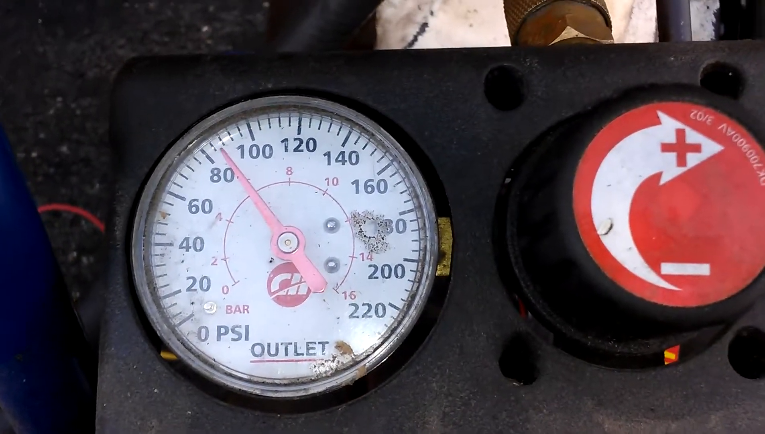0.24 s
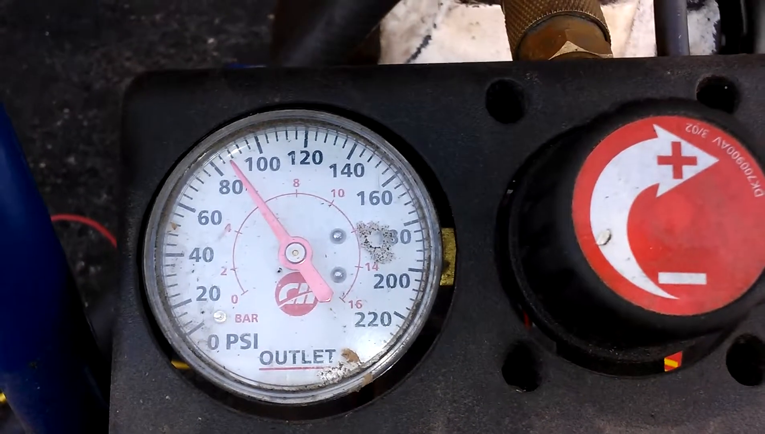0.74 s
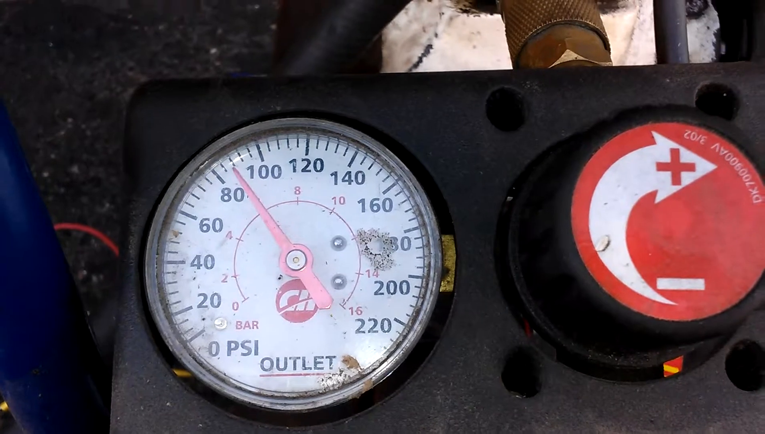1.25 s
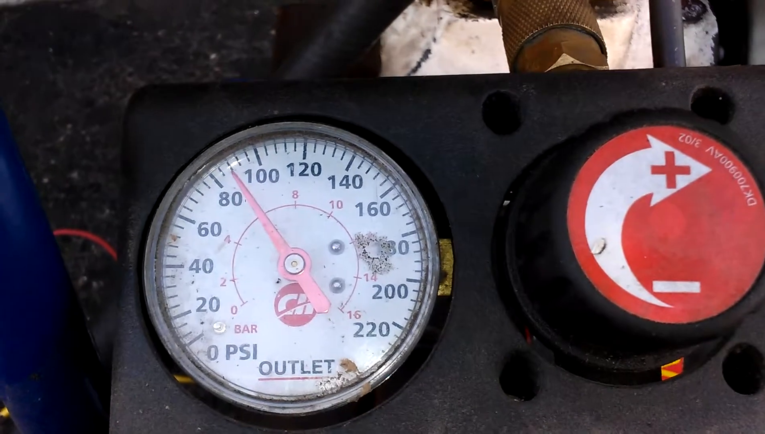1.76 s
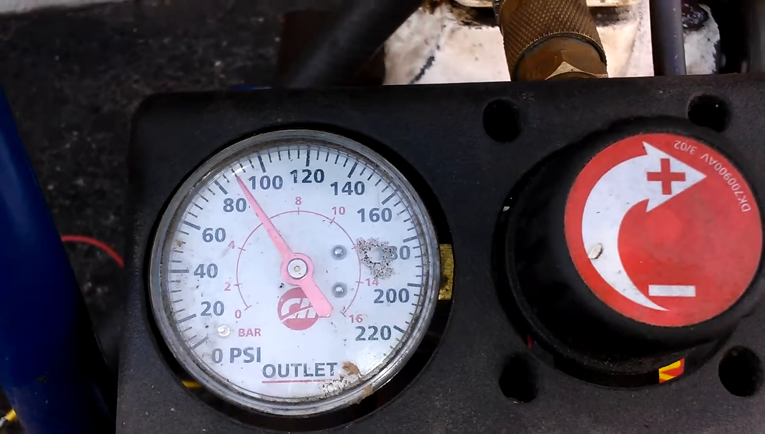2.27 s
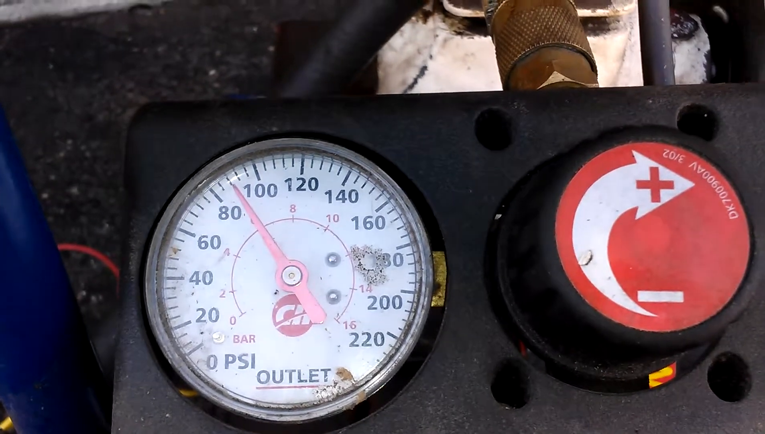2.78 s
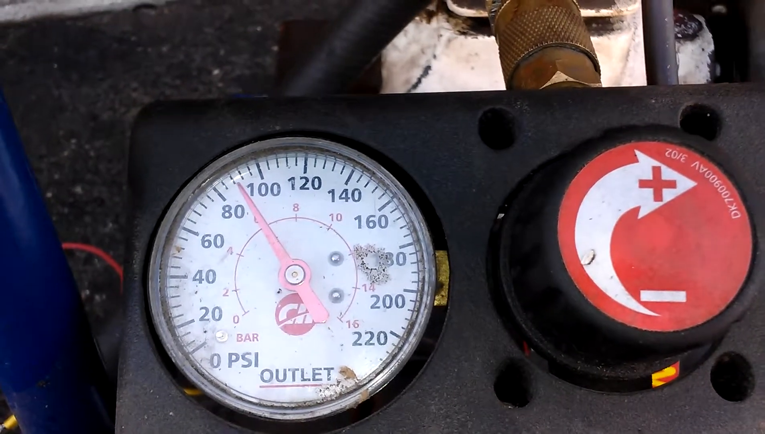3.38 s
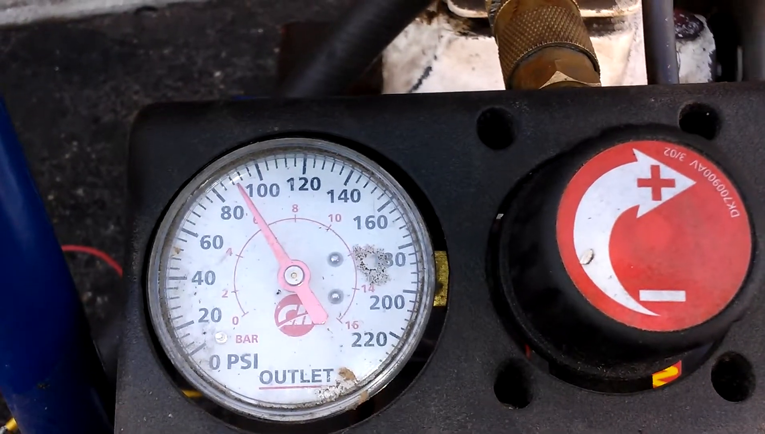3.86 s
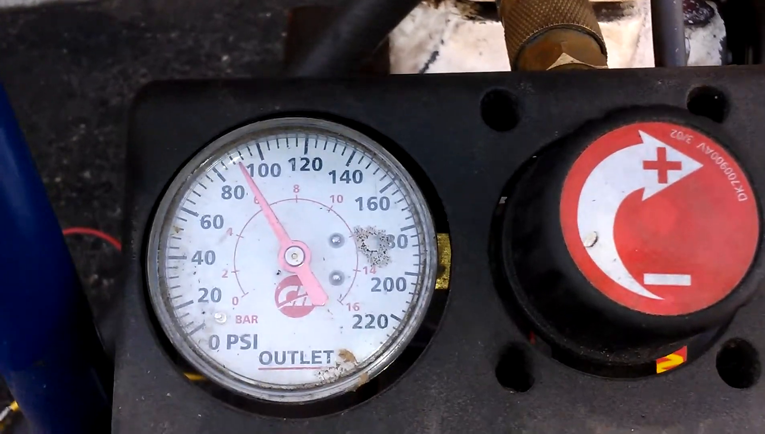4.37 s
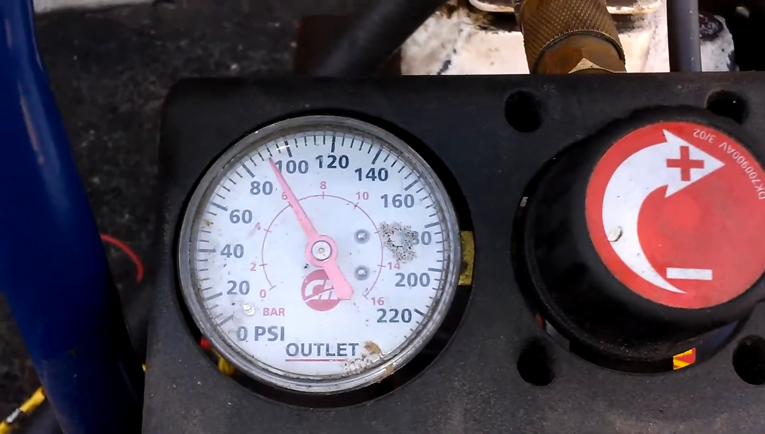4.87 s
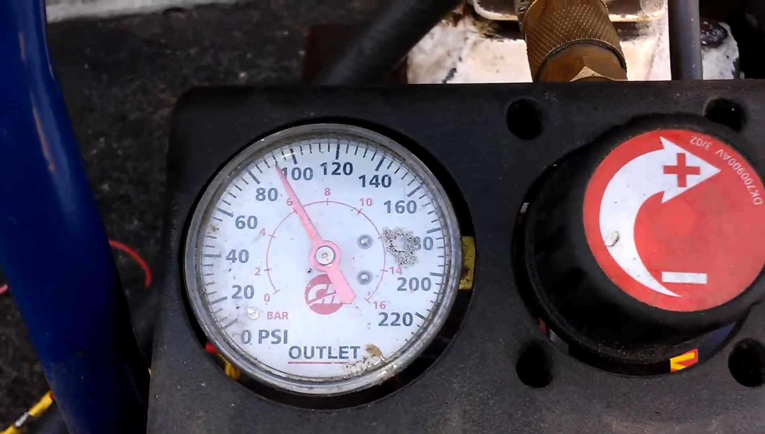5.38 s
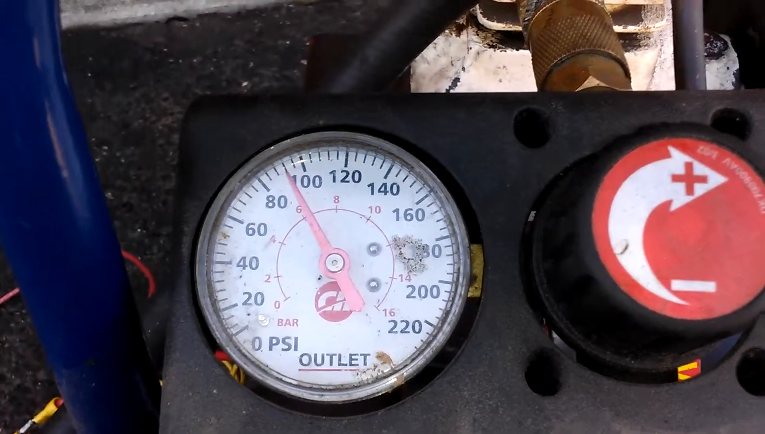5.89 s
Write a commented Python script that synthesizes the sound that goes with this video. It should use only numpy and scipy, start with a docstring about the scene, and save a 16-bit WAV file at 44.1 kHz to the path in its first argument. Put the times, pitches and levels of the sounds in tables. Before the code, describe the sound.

A small piston air compressor hammers along at close range, a fast, loud, rattling chug with metallic knocks, hissing air and buzzing panel.

```python
"""Beside a small motor-driven piston compressor filling a tank, a phone microphone close to the gauge panel.
Each crank turn rasps at the intake, lifts and knocks the discharge valve, then knocks again on release;
noise bursts ring body modes, shell and frame ring on noise, and the drive tone races past dead centre.
Noise puffs make a pulsing treble hiss over panel buzz, rumble, rocking, a thin whine and a few clinks.
The phone's limiter holds the level near full scale."""
import sys
import numpy as np
from scipy import signal
from scipy.fft import rfft, irfft, next_fast_len
from scipy.io import wavfile
from scipy.ndimage import uniform_filter1d, minimum_filter1d

SR = 44100
rng = np.random.default_rng(int(sys.argv[2]) if len(sys.argv) > 2 else 0)


def log_audio(samples):
    """Write samples as a 16-bit WAV file to the path given in sys.argv[1]."""
    # one column per channel
    frames = np.atleast_2d(samples).T
    # limit to full scale, then quantise
    limited = np.clip(frames, -1, 1)
    pcm = np.round(limited * 32767).astype(np.int16)
    wavfile.write(sys.argv[1], SR, pcm)


N = 270774

CRANK_HZ = 9.396


def undb(db):
    """Turn decibels into an amplitude gain."""
    return 10 ** (np.asarray(db) / 20)


def level(x, db):
    """Scale a signal to an rms level in dB."""
    return x * undb(db) / np.sqrt(np.mean(x ** 2))


def ring(x, hz, width_hz):
    """One resonance; white input of rms 1 gives rms near 1."""
    b, a = signal.iirpeak(hz, hz / width_hz, fs=SR)
    return signal.lfilter(b, a, x) * np.sqrt(SR / (np.pi * width_hz))


def colour(x, spectrum):
    """Filter by a table of hz and gain_db, interpolated over log frequency."""
    size = next_fast_len(N)
    table_hz, table_db = np.transpose(spectrum)
    bin_hz = np.arange(size // 2 + 1) * SR / size
    # 1 Hz is added to keep the logarithm finite at the lowest bin
    gain = undb(np.interp(np.log(bin_hz + 1), np.log(table_hz), table_db))
    return irfft(rfft(x, size) * gain, size)[:N]


def walk(rate):
    """Random levels held for 1 / rate seconds and slewed; spread near 1."""
    hold = int(SR / rate)
    steps = np.repeat(rng.standard_normal(N // hold + 1), hold)
    return 1.174 * uniform_filter1d(steps, hold)[:N]


def turn(angle, table):
    """Read the columns of a table that repeats every crank turn."""
    at_turn, *columns = np.transpose(table)
    return [np.interp(angle, at_turn, column, period=1) for column in columns]


def held(x, seconds, share):
    """Even out part of the slow chance swell of a narrow ring."""
    swell = np.sqrt(uniform_filter1d(x ** 2, int(seconds * SR)) + 1e-9)
    return level(x / swell ** np.clip(share, 0, 1), 0)


def rumble():
    """Broad, mostly low noise without a beat, shaped from white noise."""
    # Rumble spectrum: hz [Hz], density_db [dB per Hz]
    rumble_spectrum = [(15, -53), (25, -11), (145, -8), (314, 4), (448, -27), (593, -9), (846, -12),
                       (947, 8.5), (2200, -10), (2860, -58), (4840, -120)]
    return level(colour(rng.standard_normal(N), rumble_spectrum), -29)


def rocking(turns):
    """The unbalanced crank rocks the frame at low multiples of its speed."""
    # Rocking of the frame: multiple [times crank speed], level_db [dB]
    rocking_partials = [(3, -56), (4, -42.5), (5, -44), (6, -63), (7, -53), (8, -44)]
    start_turn = rng.random(len(rocking_partials))
    out = 0
    for (multiple, level_db), start in zip(rocking_partials, start_turn):
        gain = np.sqrt(2) * undb(level_db + 2.4 * walk(4.88))
        out = out + gain * np.sin(2 * np.pi * (multiple * turns + start))
    return out


def whine():
    """A thin high ring, one narrow resonance fed by noise, comes and goes."""
    whine_hz, width_hz = 3375., 10.
    whine_db, waver_db = -39, 3
    tone = ring(rng.standard_normal(N), whine_hz, width_hz)
    return undb(whine_db + waver_db * walk(5)) * held(tone, seconds=0.23, share=0.43)


def clinks():
    """A loose part of the panel is struck now and then; short noise bursts ring its modes."""
    # Strikes on the loose part: start_s [s], level_db [dB]
    strikes = [(4.83, 4), (4.94, -13), (5.145, 11.5), (5.255, 6), (5.791, 9), (6.0, -7)]
    # Modes of the loose part: hz [Hz], width_hz [Hz], level_db [dB]
    clink_modes = [(2270, 40, -29), (2890, 40, -29), (4000, 50, -30)]
    force = np.zeros(N)
    for start_s, level_db in strikes:
        force[int(start_s * SR)] = undb(level_db)
    burst = rng.standard_normal(800) * np.hanning(800)
    force = np.convolve(force, burst)[:N]
    return sum(undb(level_db) * ring(force, hz, width_hz) for hz, width_hz, level_db in clink_modes)


def panel(low_db):
    """The sheet panel buzzes on many close, weak modes, each swelling in its own time."""
    # Panel buzz spectrum: hz [Hz], gain_db [dB]
    panel_spectrum = [(1500, -4), (1800, -10), (2100, -14), (2300, -13), (2500, -3), (2830, 3), (3500, 0.5),
                      (4160, -5.5), (5000, -2), (6300, 1.5)]
    mode_count, panel_db = 60, -30.5
    modes = rng.random((mode_count, 2))
    # one mode at a random place in each equal slice of the band
    modes[:, 0] = (np.arange(mode_count) + modes[:, 0]) / mode_count
    buzz = 0
    for place, size in modes:
        force = rng.standard_normal(N) * undb(5.3 * walk(15) + low_db)
        buzz = buzz + ring(force, 1800 + 4600 * place, width_hz=30.0) * undb(6 * size)
    return level(colour(buzz, panel_spectrum), panel_db)


def grit(scatter_db):
    """Dense noise grains of uneven size, rms 1."""
    return level(rng.standard_normal(N) * undb(scatter_db * walk(900)), 0)


def puffs(rate, scatter_db):
    """Level in dB of small gusts that start sharply and fade."""
    kicks = rng.exponential(size=N) * (rng.random(N) < rate / SR)
    swell = signal.lfilter([1], [1, -np.exp(-rate / SR)], kicks)
    return scatter_db * (swell - swell.mean()) / swell.std()


def hiss(angle, late_db, rise_db):
    """Air and brush noise over the panel buzz; three treble bands swell at different crank angles."""
    # Hiss spectrum: hz [Hz], density_db [dB per Hz]
    hiss_spectrum = [(3000, -12.5), (4200, -10), (5760, -4), (6650, -5), (7220, 0.5), (9040, 5), (10400, 2),
                     (11400, 1), (13300, -2.5), (15500, -5)]
    # Narrow rings in the hiss: hz [Hz], width_hz [Hz], level_db [dB]
    hiss_rings = [(7020, 120, -33), (7380, 130, -33), (8690, 170, -28), (9260, 120, -31), (9550, 200, -30),
                  (11220, 200, -32), (11630, 60, -36), (12850, 150, -37)]
    # Hiss through one turn: angle [turns], panel_db [dB], 8_khz_db [dB], 13_khz_db [dB]
    hiss_turn = [(0, 11, 7.5, 9.5), (.13, 15, 16, 21.5), (.27, 3, 18, 14), (.38, 20, 11, 13.5),
                 (.5, -3, 15, 9.5), (.59, 0, 12, 2), (0.672, 21, 11.9, 19), (.78, -24, 10.5, 6),
                 (.9, 8, 13, 9)]
    hiss_db = -12.5
    # the late hiss swells in the second half of the turn
    late = late_db * np.clip(np.sin(2 * np.pi * (angle - .55)), 0, 1)
    gusts_db = puffs(70., scatter_db=1.53) + 0.37 * walk(25) + late
    noise = grit(scatter_db=1.56) * undb(gusts_db)
    rings = sum(undb(db - hiss_db) * ring(noise, hz, width_hz) for hz, width_hz, db in hiss_rings)
    noise = level(colour(noise, hiss_spectrum), 0) + rings
    high_pass = signal.butter(2, 11000, "high", fs=SR, output="sos")
    high = signal.sosfiltfilt(high_pass, noise)
    low_db, mid_db, high_db = turn(angle, hiss_turn)
    air = undb(mid_db) * (noise - high) + undb(high_db) * high
    return level(air, hiss_db) + panel(low_db + rise_db)


def drive(angle):
    """The drive tone labours under compression and races up once the piston is over the top."""
    # Drive tone through one turn: angle [turns], pitch_hz [Hz], level_db [dB]
    drive_turn = [(0, 128.4, -63), (.25, 150.3, -24), (0.449, 135, -33.5), (.62, 144.3, -26),
                  (.74, 183, -23.5), (.82, 225.2, -17.5), (.9, 250, -31.5)]
    pitch_hz, level_db = turn(angle, drive_turn)
    phase = 2 * np.pi * np.cumsum(pitch_hz * (1 + 0.0423 * walk(17))) / SR
    return np.sqrt(2) * undb(level_db + 1.5 * walk(20)) * np.sin(phase)


def tank(t, angle):
    """Noise shakes the tank and frame: the shell rings on a close pair, the frame hums low."""
    # Shell modes: hz [Hz], width_hz [Hz], level_db [dB]
    shell_modes = [(437, 17, 10.5), (453.2, 13.8, 34)]
    # Uneven level of the noise-fed tank ring: time_s [s], level_db [dB]
    tank_unevenness = [(0.0, -23), (0.07, -11.5), (0.36, -19.5), (0.77, -13.5), (1.08, -17.5), (1.23, -39),
                       (1.3, -15.5), (1.61, -23.5), (1.67, -15), (2.34, -21), (2.79, -10), (2.87, -24.5),
                       (3.33, -15), (4.04, -25), (4.07, -17.5), (6.14, -17)]
    # Uneven level of the noise-fed frame hum: time_s [s], level_db [dB]
    frame_unevenness = [(0.0, -31), (0.03, -25.5), (0.87, -20.5), (1.47, -30), (1.8, -15.5), (1.96, -46),
                        (2.09, -24), (5.2, -26), (5.21, -35), (5.73, -17.5), (5.78, -34), (6.14, -21)]
    frame_hz, frame_width_hz = 142.5, 6.7
    throb_hz, throb_db, throb_peak_s = 3.3, 2, 0.042
    shake = rng.standard_normal(N)
    shell = sum(undb(db) * ring(shake, hz, width_hz) for hz, width_hz, db in shell_modes)
    frame = ring(rng.standard_normal(N), frame_hz, frame_width_hz)

    tank_db = np.interp(t, *np.transpose(tank_unevenness))
    tank_db = tank_db - 1.7 * np.cos(2 * np.pi * (angle - .12))
    frame_db = np.interp(t, *np.transpose(frame_unevenness))
    frame_db = frame_db + throb_db * np.cos(2 * np.pi * throb_hz * (t - throb_peak_s))
    # the frame hums most while the piston works
    frame_db = frame_db - 2.5 * np.cos(2 * np.pi * (angle - .02))
    shell_ring = undb(tank_db) * held(shell, seconds=0.27, share=0.53)
    frame_hum = undb(frame_db) * held(frame, seconds=0.069, share=0.45)
    return shell_ring + frame_hum


def strokes(turns):
    """Strength of each blow in dB: a drift as the tank fills, two slow swings, and chance per stroke."""
    # Rows: intake rasp, discharge knock, release knock, late hiss. Columns: start_db [dB], drift [dB per s],
    # belt_db [dB], belt_peak_s [s], swell_db [dB], swell_peak_s [s], scatter_db [dB]
    blow_strength = [(-1.5, -0.52, 2.5, 0.28, -1.5, 0.1, 1.5), (-3.5, 0.58, -0.5, 0.045, 2, 0.51, 1.5),
                     (-0.5, -1.46, -2, 0.083, 1, 0.047, 3.5), (0, 0, 0, 0.13, -0.1, .37, 2.36)]
    belt_hz, swell_hz = 1.884, 1.236  # laps of the drive belt; a slower swell of the knocks
    stroke = np.floor(turns).astype(int) + 1
    # one time per stroke, half a turn before that stroke begins
    at_s = (stroke - 1.5) / CRANK_HZ
    chance = rng.standard_normal((stroke.max() + 1, len(blow_strength)))[stroke].T
    rows = []
    for settings, luck in zip(blow_strength, chance):
        start_db, drift, belt_db, belt_peak_s, swell_db, swell_peak_s, scatter_db = settings
        belt = belt_db * np.cos(2 * np.pi * belt_hz * (at_s - belt_peak_s))
        swell = swell_db * np.cos(2 * np.pi * swell_hz * (at_s - swell_peak_s))
        rows.append(start_db + drift * at_s + belt + swell + scatter_db * luck)
    return uniform_filter1d(np.array(rows), size=300)  # soften the steps between strokes


def blow(angle, stroke_db, start, rise, fall):
    """A burst of rattling force from one crank angle of every turn; start, rise and fall in turns."""
    since = (angle - start) % 1
    force = np.minimum(since / rise, 1) * np.exp(-since / fall)
    return level(force, 0) * undb(stroke_db + 0.77 * walk(150))


def body(angle, rasp_db, discharge_db, release_db):
    """Running vibration and the four blows of a turn ring the same modes of head, pipes and panel."""
    # Pitch of each body mode: hz [Hz]
    body_hz = [169, 345, 385, 555, 636, 692, 724, 748, 852, 1010, 1038, 1390, 1472, 1545, 1750, 1975, 2250,
               2890, 4380, 5005, 5600]
    # The same modes in order: width_hz [Hz], running_db [dB], rasp_db [dB], valve_lift_db [dB],
    # discharge_db [dB], release_db [dB]
    body_modes = [(13, -35.5, -37.5, -50, -56, -55), (30.3, -39, -50, -34.5, -48, -48),
                  (15.2, -29, -48, -34.5, -38, -34.5), (39.7, -34.5, -32, -29, -28, -28.5),
                  (31.8, -27, -35.5, -31, -30, -30.5), (37.3, -28.5, -50, -50, -29.5, -32.5),
                  (23.7, -24, -26, -40, -23, -22.5), (11.9, -46, -58, -55, -41, -32.5),
                  (24.4, -19.5, -50, -37, -18.5, -40), (37.8, -32, -44, -44, -45, -52),
                  (65, -37, -32, -32, -28, -50), (24.4, -46, -28, -36, -53, -40.5),
                  (28, -44, -34, -40, -51, -43), (73, -35, -26.5, -37, -55, -39),
                  (50, -44.5, -35.5, -37, -50, -50), (23.8, -52, -55, -43, -41.5, -47),
                  (119, -60, -53, -40, -38.5, -55), (35, -60, -53, -42.5, -41.5, -53),
                  (91, -46, -35.5, -45, -50, -58), (45, -60, -36, -39, -61, -62),
                  (140, -60, -33, -37, -49, -60)]
    # the running vibration eases around one crank angle
    dip_db, dip_turn = 1.5, 0.018
    running_db = 1.6 * walk(12) - dip_db * np.cos(2 * np.pi * (angle - dip_turn))
    forces = [
        undb(running_db),
        blow(angle, rasp_db, start=0.176, rise=0.013, fall=0.19),
        blow(angle, discharge_db, start=0.339, rise=.03, fall=0.19),  # valve lift
        blow(angle, discharge_db, start=0.448, rise=0.035, fall=0.11),
        blow(angle, release_db, start=0.69, rise=0.028, fall=0.12),
    ]
    powers = np.array(forces) ** 2
    out = 0
    for hz, (width_hz, *force_db) in zip(body_hz, body_modes):
        # every mode sits on another part and feels its own rattle
        strength = np.sqrt(undb(force_db) ** 2 @ powers)
        force = strength * undb(1.5 * walk(14)) * rng.standard_normal(N)
        # a second, wider pass keeps the valleys between modes dark
        rung = ring(ring(force, hz, width_hz), hz, 4.68 * width_hz)
        out = out + rung * np.sqrt(3.5 * np.pi * width_hz / SR)
    return out


def hollows(x):
    """Close to the panel, part of each narrow band is missing: subtract a share of it."""
    # Narrow dips close to the panel: hz [Hz], width_hz [Hz], depth [0-1]
    panel_dips = [(2530, 98, 0.46), (4180, 130, 0.33)]
    for hz, width_hz, depth in panel_dips:
        band = signal.lfilter(*signal.iirpeak(hz, hz / width_hz, fs=SR), x)
        x = x - np.clip(depth, 0, 1) * band
    return x


def scene():
    """The whole machine, heard by one microphone and laid on two equal channels."""
    # Unevenness of the crank: time_s [s], lag [turns behind an even crank]
    crank_lag = [(0, 0.05), (2.5, 0.00066), (6.14, .001)]
    t = np.arange(N) / SR
    turns = CRANK_HZ * t - np.interp(t, *np.transpose(crank_lag))
    angle = turns % 1
    rasp_db, discharge_db, release_db, late_db = strokes(turns)
    panel_rise_db = .5 * t  # dB, with t in seconds
    background = rumble() + rocking(turns) + whine() + clinks()
    machine = hiss(angle, late_db, panel_rise_db) + drive(angle) + tank(t, angle)
    mono = background + machine + body(angle, rasp_db, discharge_db, release_db)
    return np.array([hollows(mono)] * 2)


def record(dry):
    """The phone's quick limiter ducks around each peak, what is left clips; the top is cut."""
    top_hz = 15700
    loud = 1.367 * dry
    span = int(0.0014 * SR)
    needed = np.minimum(1, 0.92 / (np.abs(loud) + 1e-9)) ** 0.88
    gain = uniform_filter1d(minimum_filter1d(needed, span), span)
    clipped = np.clip(gain * loud, -.9, .9)
    low_pass = signal.ellip(12, .1, 80, top_hz, fs=SR, output="sos")
    return signal.sosfilt(low_pass, clipped)


dry = scene()
out = record(dry)
log_audio(out)
```